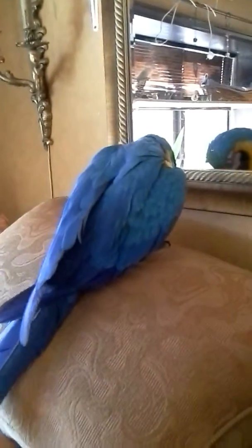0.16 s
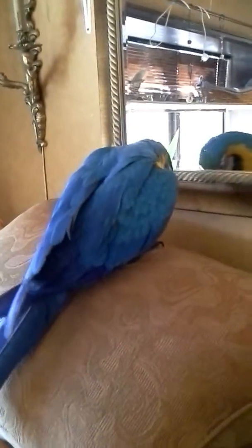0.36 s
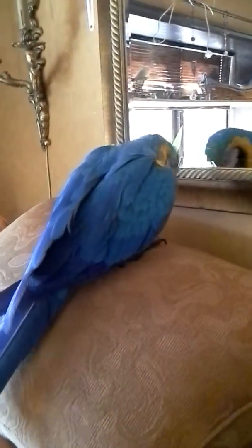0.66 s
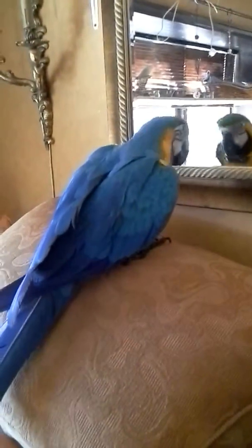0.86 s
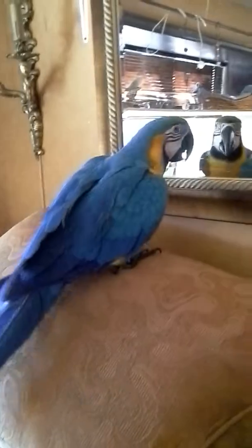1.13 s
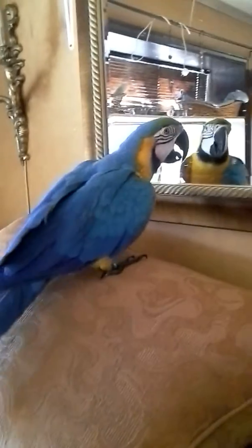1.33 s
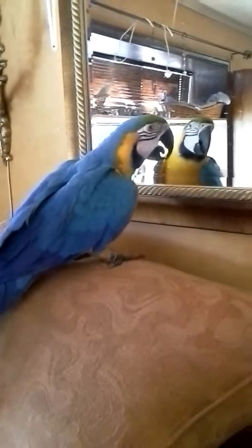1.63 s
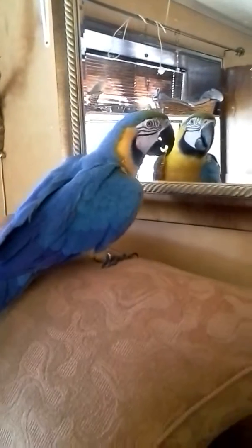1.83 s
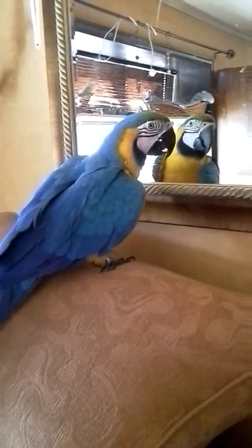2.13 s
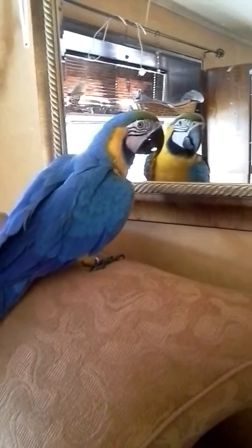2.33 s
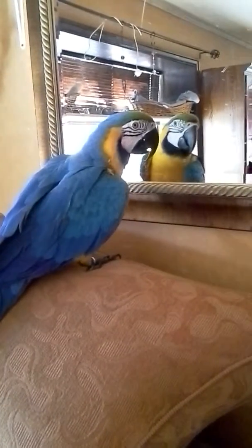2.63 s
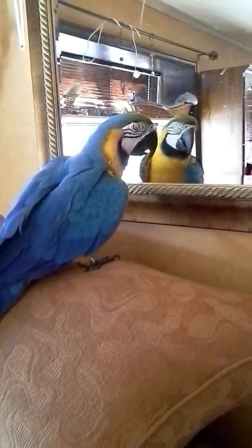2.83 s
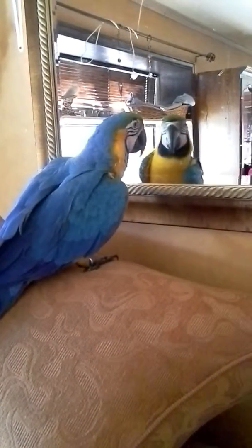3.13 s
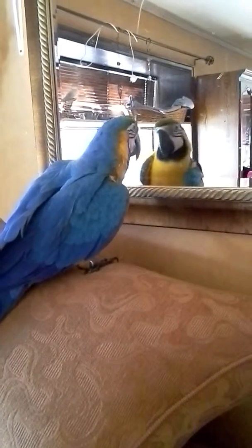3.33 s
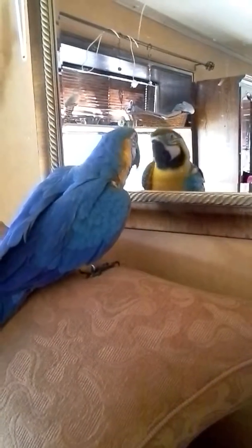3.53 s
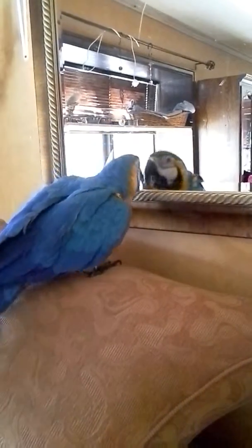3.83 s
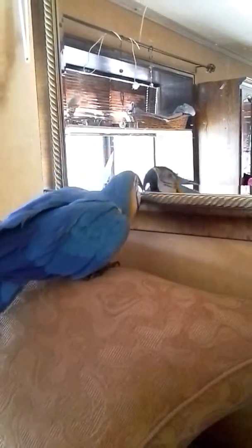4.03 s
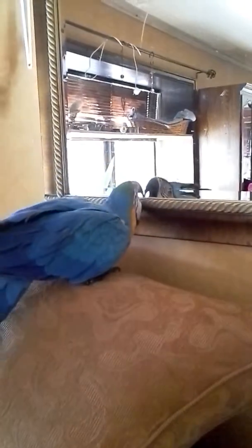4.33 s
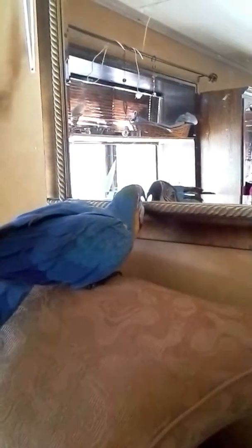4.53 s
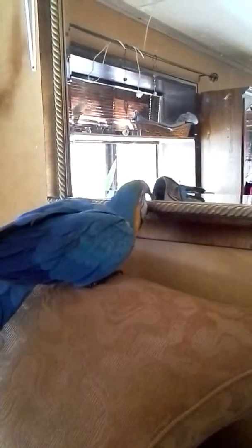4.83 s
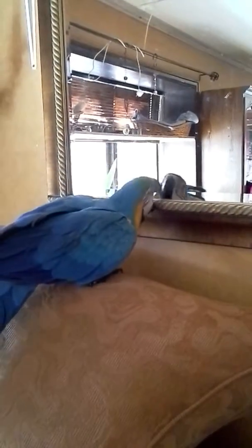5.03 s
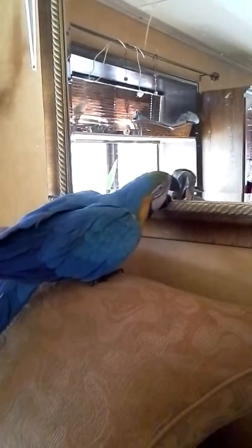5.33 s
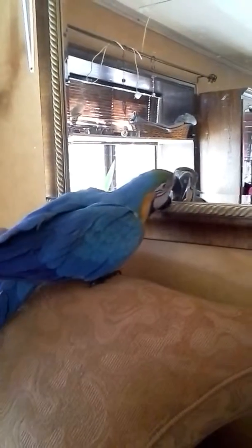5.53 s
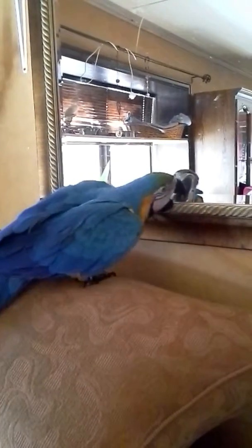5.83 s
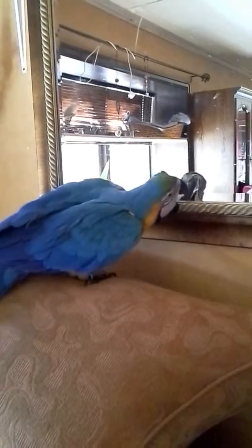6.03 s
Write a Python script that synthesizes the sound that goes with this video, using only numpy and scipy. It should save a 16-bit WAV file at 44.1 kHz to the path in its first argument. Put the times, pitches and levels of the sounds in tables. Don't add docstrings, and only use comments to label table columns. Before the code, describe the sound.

A large parrot scrapes and clacks its beak on a wooden frame indoors while taps on the hand-held phone thump deeply and rattle.

```python
import sys
import numpy as np
from scipy import signal
from scipy.fft import rfft, irfft, next_fast_len
from scipy.io import wavfile
from scipy.ndimage import uniform_filter1d

SR = 44100
rng = np.random.default_rng(int(sys.argv[2]) if len(sys.argv) > 2 else 0)


def materialize(psi):
    bounded = np.clip(np.atleast_2d(psi).T, -1, 1)
    quanta = np.round(bounded * 32767).astype(np.int16)
    wavfile.write(sys.argv[1], SR, quanta)


def undo_db(level):
    steps = np.asarray(level, float) / 20
    return 10 ** steps


N = 271656
CLOCK = np.arange(N) / SR
HISS_TOP_HZ = 14600

# (time [s], grip level [dB])
GRIP = [(0.0, -56.5), (0.45, -60), (0.7, -52), (0.96, -51.5), (1.44, -51), (1.56, -59), (2.38, -63),
        (2.81, -65), (3.41, -61), (3.77, -63.5), (3.93, -54.5), (4.39, -61.5), (4.79, -65), (5.27, -60.5),
        (5.83, -61.5), (6.16, -53)]
# (frequency [Hz], width [Hz], level [dB])
PORT = [(4340, 960, -1)]


def curve(rows):
    s, *columns = np.transpose(rows)
    return [np.interp(CLOCK, s, c) for c in columns]


def unit(x):
    return x / np.sqrt(np.mean(x ** 2))


def fade(t, t60):
    return 1000. ** (-t / t60)


def add(out, s, sound):
    i = int(s * SR)
    out[i:i + len(sound)] += sound[:N - i]


def walk(rate_hz):
    k = int(SR / rate_hz)
    held = np.repeat(rng.standard_normal(N // k + 1), k)
    return uniform_filter1d(uniform_filter1d(held, k), k)[:N]


def lowpass(x, order, hz):
    return signal.lfilter(*signal.butter(order, hz, fs=SR), x)


def resonate(x, peaks):
    return sum(undo_db(db) * signal.lfilter(*signal.iirpeak(hz, hz / width, SR), x) for hz, width, db in peaks)


def coloured(points, flicker_db, rate_hz, count=15):
    size = next_fast_len(N)
    octave = np.log2(np.arange(size // 2 + 1) * SR / size + 1)
    hz, db = np.transpose(points)
    spectrum = rfft(rng.standard_normal(size)) * undo_db(np.interp(octave, np.log2(hz), db))
    spectrum = spectrum * (octave < np.log2(HISS_TOP_HZ))
    out = np.zeros(N)
    for centre in range(4, count):
        band = irfft(spectrum * np.clip(1 - abs(octave - centre), 0, 1), size)[:N]
        out += band * undo_db(flicker_db * walk(rate_hz))
    return out


def grip_rumble():
    # (frequency [Hz], level per Hz [dB])
    spectrum = [(15, -18), (30, 2), (60, 3), (95, 5), (130, -2), (190, -11), (500, -33.5), (1000, -59)]
    return undo_db(curve(GRIP)[0] + 9) * unit(coloured(spectrum, 7.3, 20, count=11))


def hiss():
    # (frequency [Hz], level per Hz [dB])
    left_spectrum = [(60, 5), (350, 14), (600, 11.5), (1000, 8), (1700, 4.5), (2800, 2.5), (4600, 0.5),
                     (16000, -0.5)]
    # (frequency [Hz], level per Hz [dB])
    right_spectrum = [(16, -26), (40, 5), (100, 20), (350, 16.5), (700, 10.5), (1700, 5), (6000, 2),
                      (16000, -1.5)]
    base_db, db_per_grip_db, calm_grip_db, lag_s = -71.5, 0.4275, -62, 0.54
    slow_grip_db = uniform_filter1d(curve(GRIP)[0] - calm_grip_db, int(lag_s * SR))
    level_db = base_db + db_per_grip_db * slow_grip_db
    noise = np.array([coloured(left_spectrum, 3.6, 2.94), coloured(right_spectrum, 2.27, 22.01)])
    return undo_db(level_db - 16.5) * noise * np.sqrt(SR / 2) / 10


def motor_hum():
    hum_hz, hum_db = 245, -65
    turns = np.cumsum(hum_hz + 1.427 * walk(7.1)) / SR
    return np.sqrt(2) * undo_db(hum_db + 0.82 * walk(36)) * np.sin(2 * np.pi * turns)


def draught():
    # (time of crest [s], level above still air [dB], half length [s])
    gusts = [
        (0.1, 9, 0.44),
        (0.94, 10.5, 0.5),
        (1.71, 12, 0.18),
        (3.55, 4.5, 0.38),
        (4.27, 10, 0.23),
        (4.926, 8, 0.21),
        (5.4, 6, 0.32),
        (5.88, 11, 0.2),
    ]
    still_air_db = -77
    level_db = still_air_db + sum(db * np.exp(-((CLOCK - s) / half_s) ** 2) for s, db, half_s in gusts)
    air = resonate(resonate(rng.standard_normal(N), PORT), [(4600, 6100, 0)])
    return undo_db(level_db + 1.5 + 4.3 * walk(13)) * unit(air)


def whistle():
    # (time [s], frequency [Hz], level [dB])
    glide = [(0, 5700, -74), (.06, 5600, -82), (.15, 5600, -92), (.21, 5600, -80), (.26, 5880, -77),
             (.33, 5830, -72), (.39, 5470, -84), (.47, 5750, -73), (.5, 5700, -92)]
    hz, db = curve(glide)
    level = undo_db(db + 9.5 + 4.5 * walk(39.4)) * (CLOCK < glide[-1][0])
    return level * np.sin(2 * np.pi * np.cumsum(hz) / SR)


def presses():
    # (time [s], peak level [dB], final frequency [Hz], t60 [s])
    pushes = [(0.123, -22.5, 92.6, 0.098), (.147, -31, 96, 0.05), (0.354, -21.5, 113, 0.03),
              (.518, -38.5, 91, 0.12), (0.58, -38.5, 94.5, 0.38), (.751, -28, 94, 0.071),
              (0.978, -21.5, 95.6, 0.084), (1.047, -31, 96.5, 0.051), (1.139, -32, 97, 0.04),
              (1.226, -23.5, 92, 0.098), (3.68, -42.5, 104, 0.12), (3.695, -38.5, 94, 0.11),
              (6.066, -31.5, 131, 0.031)]
    settle_s, attack_s = 0.0032, 0.002
    out, t = np.zeros(N), np.arange(int(.2 * SR)) / SR
    for s, db, hz, t60 in pushes:
        turns = hz * (t + settle_s * (1 - np.exp(-t / settle_s)))
        swell = (1 - np.exp(-(t / attack_s) ** 2)) * fade(t, t60)
        add(out, s, undo_db(db + 6) * swell * np.sin(2 * np.pi * turns))
    return out


def beak():
    # (time [s], sharp level [dB], dull level re sharp [dB], scrape t60 [s])
    scrapes = [(.389, -63, 6, 0.018), (3.851, -28.5, -13, 0.04), (3.866, -40, -30, 0.12),
               (3.898, -44, -22, 0.068), (3.948, -35, -2, 0.057), (4.379, -56.5, 9.5, 0.051),
               (4.402, -57, 0, 0.039), (4.90, -70.5, 9, 0.22), (4.987, -54.5, 0.5, 0.03),
               (5.02, -70, 10, 0.17), (5.0551, -47, 2, 0.041), (5.080, -49, 0.5, 0.027),
               (5.163, -57, -5, 0.023), (5.2258, -43, -4, 0.039), (5.238, -39, 0, 0.056),
               (5.25, -52, -2, 0.054), (5.488, -66, 7.5, 0.079), (5.514, -71, 4, 0.045),
               (5.709, -60, -2, 0.036), (5.769, -64.5, 4.5, 0.086), (5.896, -58.5, 6.5, 0.12),
               (5.953, -67.5, 16.5, 0.055), (5.985, -67.5, 15.5, 0.094), (6.011, -69, 14.5, 0.054),
               (6.040, -59.5, 12, 0.069), (6.090, -67.5, 6.5, 0.15)]
    # (frequency [Hz], width [Hz], level [dB])
    sharp_peaks = [(2400, 720, -26), (2920, 580, 4.5), (3670, 380, 4), (4500, 390, 6.5)]
    # (frequency [Hz], width [Hz], level [dB])
    dull_peaks = [(356, 95, -0.5), (522, 205, 3.5), (726, 130, -3.5), (1000, 580, -6.5), (1625, 164, -4.5)]
    # (frequency [Hz], width [Hz], level [dB])
    top_peaks = [(6700, 1900, 0)]
    room_t60_s, room_db = 0.25, -9.5
    under_hand_db, under_hand_hz = -13, 1500
    knock_db, knock_sample = 17.5, 20
    sharp, dull, top = np.zeros((3, 2, N))
    t = np.arange(int(.3 * SR)) / SR
    room = undo_db(room_db) * (1 - np.exp(-t / 0.0079)) * fade(t, room_t60_s)
    for s, db, dull_db, t60 in scrapes:
        top_db = -19 + 1.5 * dull_db
        scrape = (1 - np.exp(-t / (.015 * t60))) * fade(t, t60)
        catch = np.repeat(rng.standard_normal(len(t) // 50 + 1), 50)[:len(t)]
        scrape = scrape * undo_db(3.0 * catch)
        in_room = np.hypot(scrape, room)
        for port in range(2):
            grit = np.sign(rng.standard_normal((3, len(t))))
            grit[:, knock_sample] = -undo_db(knock_db)
            add(sharp[port], s, undo_db(db + 9.0) * grit[0] * in_room)
            add(dull[port], s, undo_db(db + dull_db + 18.5) * grit[1] * in_room)
            add(top[port], s, undo_db(db + top_db + 14.5) * grit[2] * scrape * fade(t, 0.057))
    body = resonate(sharp, sharp_peaks) + lowpass(resonate(dull, dull_peaks), 2, 2100)
    body = signal.sosfilt(signal.butter(5, 5010, fs=SR, output="sos"), body)
    left, right = body + resonate(top, top_peaks)
    return np.array([undo_db(under_hand_db) * lowpass(left, 1, under_hand_hz), right])


def slips():
    # (time [s], peak level [dB], lowest frequency [Hz])
    ticks = [(0.6537, -29, 300), (.677, -33, 300), (.6867, -42, 1200), (0.694, -30.5, 1800),
             (0.7052, -39, 2500), (0.709, -38, 2440), (0.7092, -35, 2500), (.7184, -46, 2450),
             (.7254, -48.5, 2200), (0.7262, -28.5, 2200), (0.728, -37, 2200), (.7283, -45, 2200),
             (0.7335, -37, 2200), (.7532, -49, 2500), (1.214, -51, 1200), (2.6238, -26, 600),
             (2.6944, -32, 450), (3.6754, -57, 1000), (4.1834, -62, 1500)]
    out, t = np.zeros(N), np.arange(400) / SR
    for s, db, low_hz in ticks:
        grit = undo_db(-19) * np.sign(rng.standard_normal(len(t))) * fade(t, 0.0048)
        burst = lowpass(grit - (t == 0), 2, min(7 * low_hz, 16000))
        burst = signal.lfilter(*signal.butter(2, low_hz, "high", fs=SR), burst)
        add(out, s, undo_db(db + 9) * burst)
    return out


def ringing(modes, t, pitch=1):
    return sum(swing * fade(t, t60) * np.cos(2 * np.pi * hz * pitch * (t - crest_s))
               for hz, t60, swing, crest_s in modes)


def taps():
    # (time [s], boom level [dB], ring level [dB], pitch factor, crack level [dB])
    blows = [
        (1.2436, 0.7, -2.5, 1.015, -26.5),
        (1.3247, 2.1, 1.9, 1.02, -29),
        (1.5378, 2.3, 2.5, 1.005, -26.5),
        (1.5534, -0.6, 0, 1.005, -30.5),
        (2.283, -0.3, 0.8, 1.013, -27.5),
        (3.1229, -1.5, -0.5, 0.98, -32.5),
        (3.8466, 1, 1.9, .99, -24.5),
        (4.1442, 0.5, 3, 1.01, -27.5),
        (5.6776, -1, 0.5, 1.02, -30),
    ]
    # (frequency [Hz], t60 [s], swing, first crest after contact [s])
    pocket_modes = [(71.2, .076, 1.13, .0024), (121, .036, -1.96, .0022), (211, .034, .72, .0029),
                    (291, .016, .57, .0014), (700, .0065, .57, .0004)]
    # (frequency [Hz], t60 [s], swing, first crest after contact [s])
    case_modes = [(633, .018, .35, .00146), (1019, .0175, -.2, .0004), (1889, .0063, .08, .00005),
                  (2241, .0054, -.06, .0004)]
    crack_peaks = [(3800, 1040, 7), (6330, 4900, -7.5), (8900, 3200, -10), (13500, 2000, -6)]
    tick_peaks = [(2200, 2000, -3), (4100, 1500, 0), (9000, 4000, -8)]
    contact_s, echo_s, echo_db = .00012, 0.00131, -2.5
    left, right = np.zeros((2, N))
    lead_s = 10 * contact_s
    t = np.arange(int(.12 * SR)) / SR - lead_s
    after = np.maximum(t, 0)
    snap = undo_db(8.5) * (np.cumsum(t > 0) == 1)
    for s, boom_db, ring_db, pitch, crack_db in blows:
        boom = ringing(pocket_modes, after, pitch)
        ring = ringing(case_modes, after)
        crack = np.sign(rng.standard_normal((2, len(t)))) * fade(after, 0.0082) * (t > 0)
        crack = crack + snap * np.array([[1], [-1]])
        blow = (undo_db(boom_db) * boom + undo_db(ring_db) * ring) * np.exp(np.minimum(t, 0) / contact_s)
        add(left, s - lead_s, blow + undo_db(crack_db) * resonate(crack[0], crack_peaks))
        sharp = np.roll(undo_db(-8) * crack[1] - snap, 8)
        echo = undo_db(echo_db) * np.roll(sharp, int(echo_s * SR))
        late_ring = undo_db(-7) * np.roll(ring, int(.001 * SR)) * (t > .001)
        tick = resonate(sharp + echo, tick_peaks) - late_ring
        add(right, s - lead_s, undo_db(crack_db - 4.5) * tick)
    return np.array([left, right])


def rattle():
    # (time of first bounce [s], peak level [dB], loss per bounce [dB])
    throws = [
        (1.249, -42, 12),
        (1.3295, -38, 12),
        (1.5448, -28, 3),
        (1.56, -28.5, 1),
        (2.290, -35, 18),
        (2.2966, -39.5, 8),
        (3.128, -48, 5.5),
    ]
    count, bounce_s, buzz_s, last_bounce_db = 4, .0035, .0013, -24
    out, t = np.zeros(N), np.arange(100) / SR
    for s, db, loss_db in throws:
        for k in range(count):
            buzz = np.sign(rng.standard_normal(len(t))) * (t < buzz_s)
            buzz = buzz / np.abs(resonate(buzz, PORT)).max()
            level_db = db - k * loss_db + last_bounce_db * (k == count - 1)
            add(out, s + k * bounce_s, undo_db(level_db) * buzz)
    return resonate(resonate(out, PORT), [(4240, 1500, 1.5), (2200, 2200, 0.5)])


def clacks():
    # (time [s], peak level [dB], frequency [Hz])
    claps = [
        (3.948, -21, 1700),
        (4.379, -52, 7000),
        (5.0557, -50, 6000),
        (5.239, -33, 7360),
        (5.897, -38, 1500),
    ]
    out, t = np.zeros(N), np.arange(int(.05 * SR)) / SR
    for s, db, hz in claps:
        burst = rng.standard_normal(len(t)) * fade(t, 0.033)
        add(out, s, resonate(burst, [(hz, 0.5 * hz, db)]))
    return out


def scene():
    hum = motor_hum()
    left = grip_rumble() + undo_db(-20.5) * hum + presses() + slips()
    right = hum + draught() + whistle() + rattle() + clacks()
    return hiss() + beak() + taps() + np.array([left, right])


def top_cut(x):
    return signal.sosfilt(signal.butter(12, 15840, fs=SR, output="sos"), x)


def record(dry):
    mix = signal.sosfiltfilt(signal.butter(2, 22, "high", fs=SR, output="sos"), dry)
    mix = signal.sosfilt(signal.ellip(4, .3, 14, HISS_TOP_HZ, fs=SR, output="sos"), mix)
    return top_cut(mix)


dry = scene()
out = record(dry)
materialize(out)
```